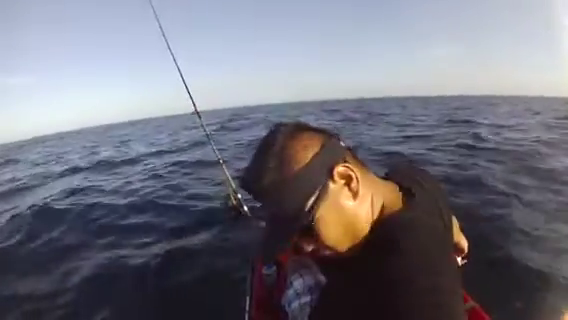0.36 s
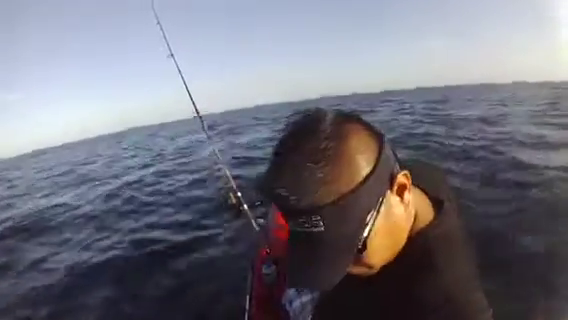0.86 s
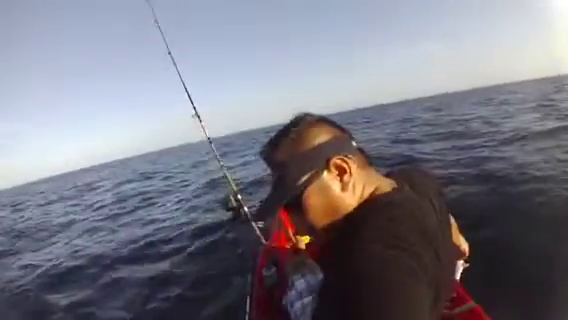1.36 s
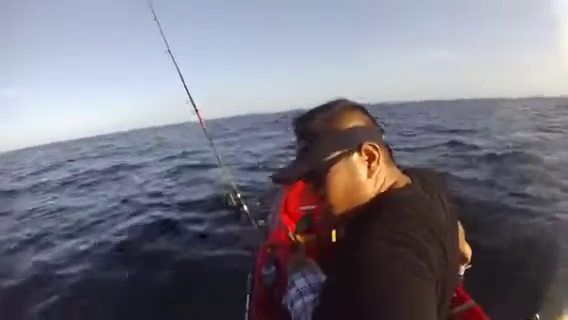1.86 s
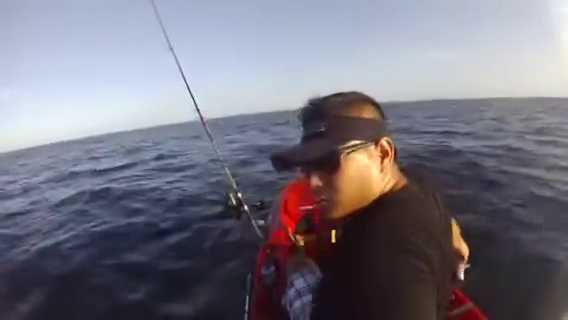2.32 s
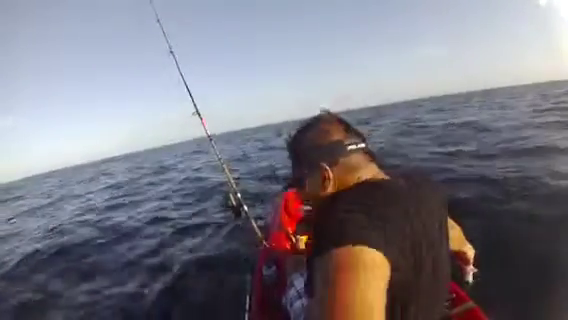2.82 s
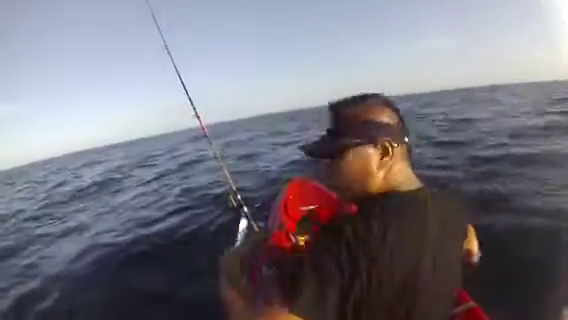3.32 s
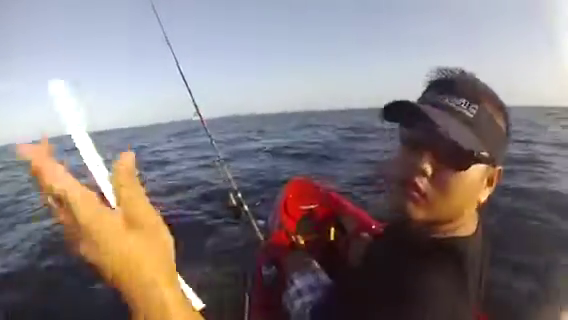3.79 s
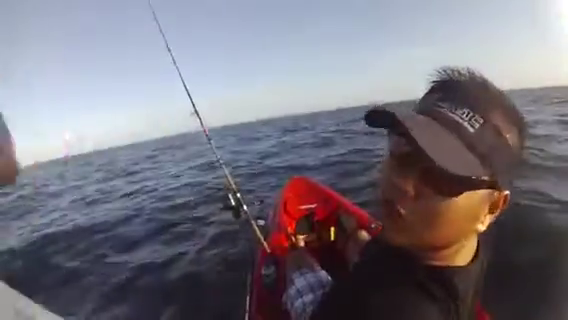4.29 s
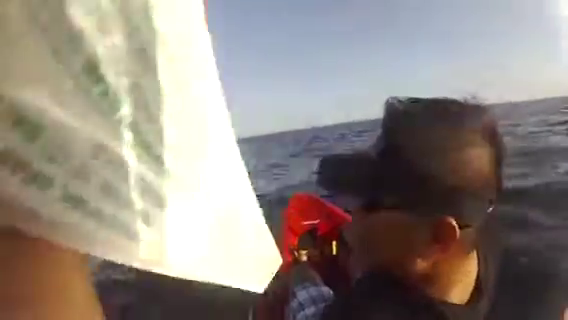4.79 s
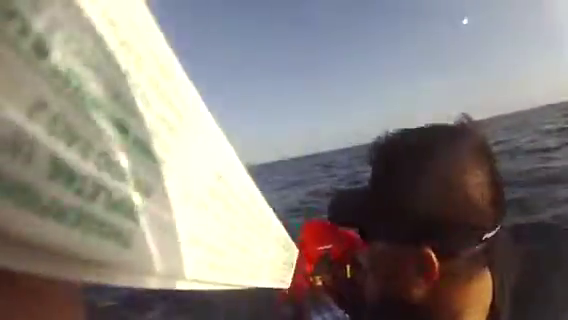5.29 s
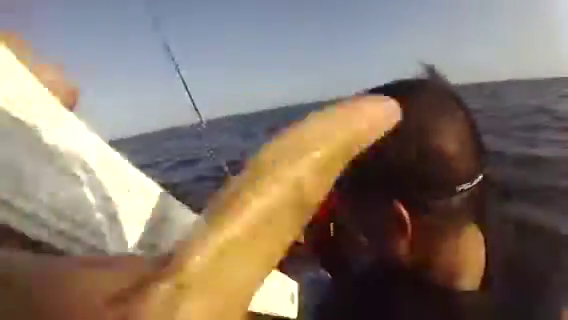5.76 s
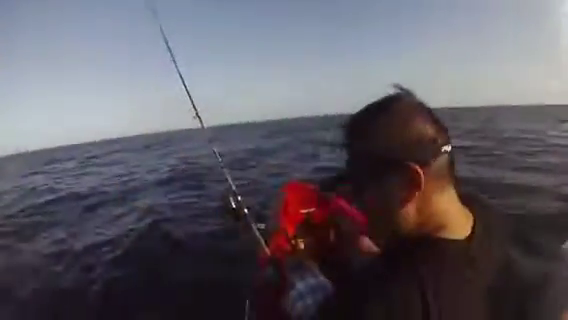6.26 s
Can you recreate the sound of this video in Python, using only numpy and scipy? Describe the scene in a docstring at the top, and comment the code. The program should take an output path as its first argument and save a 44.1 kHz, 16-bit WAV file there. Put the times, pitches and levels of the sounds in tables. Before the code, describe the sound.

Close, boxy sound from a cased microphone: soft hiss, a barely audible hum, irregular dull thumps and seat shuffles through a boat hull, busiest midway. Then a finger squeaks on plastic, paper scuffs the case and sharp clacks with heavy thuds strike it. A crackling, clipped jolt bursts out and the background drops to near-silence with tiny leftover knocks.

```python
"""Cased camera on a small boat

Over microphone hiss and a faint hum, shifting weight knocks and shuffles through the hull: clicks into ringing modes.
Then a hand wipes the camera's sealed plastic case: friction grains rub, clicks into case modes make hard taps,
and stick-slip grains with chirps squeak. A rattling jolt of alternating shoves overloads the microphone; the hiss
drops after the squeak and falls far lower during the jolt."""
import sys
import numpy as np
from scipy import signal
from scipy.fft import rfft, irfft, next_fast_len
from scipy.io import wavfile

SR = 44100
rng = np.random.default_rng(int(sys.argv[2]) if len(sys.argv) > 2 else 0)


def unload_audio(sound):
    """Save the sound as a 16-bit wav file, at the path given as the first command line argument."""
    columns = np.transpose(np.atleast_2d(sound))
    # keep every value between -1 and 1, then stretch to whole-number steps
    steps = np.round(np.clip(columns, -1, 1) * 32767)
    wavfile.write(sys.argv[1], SR, steps.astype(np.int16))


def level_to_linear(level):
    """Convert decibel levels to linear amplitude factors, elementwise."""
    exponent = np.asarray(level, float) / 20
    return 10 ** exponent


N = 281421   # length in samples
CUTOFF_HZ = 15500   # top of the hiss; the microphone's top cut lies just above


def rms_one(x):
    """Scale to rms 1."""
    return x / np.sqrt(np.mean(x ** 2) + 1e-20)


def in_time(rows):
    """Curve columns at every sample, silent outside the curve."""
    s, *columns = np.transpose(rows)
    t = np.arange(N) / SR
    return [np.interp(t, s, c, left=-200, right=-200) for c in columns]


def swells(rows, start_db, end_db):
    """Gain of each level column: a gesture sets in below its peak, rises, falls and lets go within 5 ms."""
    out = 0
    for s, rise, fall, *peak_db in rows:
        times = s + np.cumsum([-.005, .005, rise, fall, .005])
        levels = [-60, start_db, 0, end_db, end_db - 40]
        shape, = in_time(np.transpose([times, levels]))
        out = out + level_to_linear(shape + np.array(peak_db)[:, None])
    return out


def train(times, sizes):
    """Clicks of the given sizes at the given times."""
    out = np.full(N, 1e-18)
    np.add.at(out, np.minimum((np.asarray(times) * SR).astype(int), N - 1), sizes)
    return out


def grains(per_s, spread_db):
    """Random clicks of uneven size; rms 1."""
    sizes = level_to_linear(spread_db * np.minimum(rng.exponential(1, N), 4))
    sizes = sizes * rng.choice([-1, 1], N)
    return rms_one(sizes * (rng.random(N) < per_s / SR))


def ring(x, hz, t60):
    """Two-pole resonance: a unit click sets a sine of height 1 ringing, 60 dB down after t60 seconds."""
    r = level_to_linear(-60 / (t60 * SR))
    w = 2 * np.pi * hz / SR
    return signal.lfilter([0, np.sin(w)], [1, -2 * r * np.cos(w), r * r], x)


def peaks(x, table):
    """Parallel resonances, each with its gain on top, signs alternating."""
    out = 0
    for k, (hz, width, db) in enumerate(table):
        t60 = np.log(1000) / np.pi / width
        out = out + (-1) ** k * level_to_linear(db) * width / SR * np.pi * ring(x, hz, t60)
    return out


# colour of the hiss: f/Hz, relative density level/dB per Hz
HISS_COLOUR = [(30, -29), (60, -33.5), (108, -21), (172, -18.5), (233, -8), (698, -5.5), (862, -2.5),
               (15000, -21.5)]
# hiss rms, dropping after the squeak and far more during the jolt: t/s, level/dB
HISS_LEVEL = [(0, -48.5), (.5, -46.5), (4.39, -47), (4.42, -52), (5.42, -51.5), (5.435, -78.5),
              (6.39, -80.5)]


def hiss():
    """Microphone and far water: noise coloured in its spectrum, then ridden along a level curve."""
    hz, db = np.transpose(HISS_COLOUR)
    size = next_fast_len(N)
    f = np.arange(size // 2 + 1) * SR / size
    colour = level_to_linear(np.interp(np.log(f + 1), np.log(hz), db)) * (f < CUTOFF_HZ)
    noise = irfft(rfft(rng.standard_normal(size)) * colour, size)[:N]
    return level_to_linear(in_time(HISS_LEVEL)[0]) * rms_one(noise)


# resonances of the hull: f/Hz, relative level/dB, t60/s
HULL_MODES = [(145.2, -9, 0.12), (215, -7, 0.25), (241.3, -0.5, 0.1), (352, -4, 0.079), (560, -9, 0.14),
              (611, -0.5, .07), (683, -1, 0.048), (773, -7, 0.068), (830.3, -5.5, 0.083), (1128, -8, 0.045),
              (1564, -1.5, 0.015), (1914, -10.5, 0.018), (2970, -7, 0.0038)]
# where the modes divide into boom, body, ring and edge: f/Hz
HULL_SPLITS = [450, 725, 1000]
# knocks through the hull, before each mode's own level: t/s, boom, body, ring and edge level/dB
KNOCKS = [(0.384, -45, -43, -36, -55), (0.441, -11, -27.5, -23.5, -58), (0.468, -16.5, -43, -44, -29.5),
          (0.953, -38, -38, -54, -58), (1.082, -39, -31, -30, -43), (1.295, -24, -32, -34, -39.5),
          (1.775, -34, -25.5, -37, -34.5), (2.214, -21, -27.5, -22.5, -28.5), (2.536, -55, -40, -30.5, -39),
          (2.57, -22, -38.5, -30, -42), (2.651, -25, -29, -24, -32), (2.671, -16.5, -18.5, -21, -31),
          (2.788, -26.5, -40, -30.5, -50), (2.984, -29.5, -37.5, -27.5, -39.5),
          (3.936, -33.5, -28, -23, -47), (6.328, -56, -59, -58, -64), (6.365, -71, -57.5, -66, -62)]
# restless small movements on the seat: t/s, boom drive level/dB, ring drive level/dB
RESTLESS = [(0, -48, -53), (.08, -47.5, -39), (.35, -64, -75), (.65, -54.5, -57), (1.4, -50, -45),
            (2.0, -42.5, -44.5), (3.1, -58.5, -59), (3.9, -68, -61), (4.02, -46, -53), (4.3, -86, -70)]
# weight shifting on the seat: start t/s, rise t/s, fall t/s, peak boom drive level/dB, peak ring drive level/dB
SHIFTS = [(.385, 0.075, .11, -26, -25.5), (1.625, 0.024, 0.083, -43, -30.5), (1.72, 0.054, .02, -39, -23.5),
          (1.8, 0.07, 0.038, -50, -39), (2.535, 0.05, 0.1, -50, -31.5), (2.65, 0.037, 0.13, -38, -30.5)]


def hull():
    """A knock is a soft blow with a short rumble after it; shuffling is a dense stream of tiny contacts."""
    knocks = np.array(KNOCKS)
    moving = level_to_linear(np.array(in_time(RESTLESS))) + swells(SHIFTS, start_db=-9, end_db=-19)
    boom_db, ring_db = 20 * np.log10(moving)
    edge_db = -45.5 + 1.46 * (ring_db + 40.5)   # harder shuffling is brighter
    # one row each for boom, body, ring, edge; the body follows the ring
    drive = level_to_linear([boom_db, ring_db, ring_db, edge_db])
    # water keeps the ring modes murmuring
    drive[2] += level_to_linear(np.where(ring_db > -100, -52., ring_db))

    stream = grains(per_s=450, spread_db=4.5)
    rumble = grains(per_s=1300, spread_db=1.5)
    fade = np.exp(-1 / (0.0122 * SR))   # rumble decays with a 12.2 ms time constant
    out = 0
    for hz, level_db, t60 in HULL_MODES:
        part = np.searchsorted(HULL_SPLITS, hz)
        uneven_db = 2 * rng.standard_normal(len(knocks))
        late = 0.001462 * np.abs(rng.standard_normal(len(knocks)))   # seconds
        size = level_to_linear(knocks[:, 1 + part] + level_db + (3 if part else -5) + uneven_db)
        blows = train(knocks[:, 0] + late, size)
        blows += level_to_linear(-30.5) * rumble * signal.lfilter([1], [1, -fade], blows)
        shuffle = level_to_linear(level_db - 28) * drive[part] * stream
        swell = ring(blows + shuffle, hz, t60 / 10)   # the mode swells before it dies
        out = out + ring(swell, hz, t60) * 20 * np.log(1000) / (t60 * SR)
    return out


def hum():
    """Noise through a narrow resonance, twice: a faint hum that wavers until the hand reaches the case."""
    peak = [(864, 22, 0)]   # f/Hz, width/Hz, level/dB
    tone = rms_one(peaks(peaks(rng.standard_normal(N), peak), peak))
    return level_to_linear(-59.5) * tone * (np.arange(N) < 4.3 * SR)


# resonances of the camera case, shared by rubbing and taps: f/Hz, relative level/dB, t60/s
CASE_MODES = [(180.7, -13, 0.079), (300, -4, 0.033), (417, -2, 0.033), (563, 3.5, 0.022),
              (790, -10.5, 0.017), (1510, 4, 0.0065), (1990, 1, 0.0058), (2507, -1, 0.0034),
              (3300, -9, 0.0059)]
# scratch resonances of paper on the case: f/Hz, width/Hz, level/dB per pass
PAPER_PEAKS = [(1330, 270, 4.5), (2050, 1300, -2.5), (3400, 710, -5)]
# paper lying against the case: t/s, low level/dB, high level/dB
PAPER = [(4.29, -80, -88), (4.32, -38.5, -44), (4.44, -44, -42.5), (4.47, -55, -70), (4.65, -58.5, -77),
         (4.72, -45.5, -45), (5.03, -45, -61.5), (5.07, -48, -46.5), (5.39, -52.5, -55), (5.47, -44.5, -62),
         (5.53, -78, -80)]
# short scuffs of the paper: start t/s, rise t/s, fall t/s, peak low level/dB, peak high level/dB
SCUFFS = [(4.665, 0.026, 0.044, -34.5, -40), (4.798, 0.022, 0.031, -26.5, -28.5),
          (4.885, 0.015, 0.013, -30.5, -35.5), (5.4, 0.014, 0.0081, -45, -16), (5.6, .012, .045, -62, -68)]


def rubbing():
    """Friction grains: the low case modes rumble, the paper scratches above them."""
    gains = level_to_linear(np.array(in_time(PAPER))) + swells(SCUFFS, start_db=-14.5, end_db=-19.5)
    low_gain, high_gain = gains
    low = 0
    for hz, db, t60 in CASE_MODES[:5]:
        low = low + level_to_linear(db) / hz * ring(grains(per_s=540, spread_db=4.0), hz, t60)
    scratch = grains(per_s=5900, spread_db=-1.5)
    high = peaks(peaks(scratch, PAPER_PEAKS), PAPER_PEAKS)   # two passes sharpen the peaks
    return low_gain * rms_one(low) + high_gain * rms_one(high)


# taps on the case, before trims and modes: t/s, thud level/dB, tick level/dB, tilt of the thud in dB per octave
TAPS = [(4.304, -30, -25.5, -3), (4.658, -1, -21, 1.5), (4.82, 1, -21, 3.5), (4.834, -10.5, -23, -5.5),
        (4.899, -24, -35, 5), (4.956, 2.5, -12.5, 5.5), (4.963, -9.5, -24.5, -6.5),
        (4.971, -13.5, -26, -0.5), (5.039, -16, -62, -1.5), (5.222, -45, -31.5, -1),
        (5.439, -11.5, -22.5, 3.5), (5.4465, -18, -15, 0), (5.461, -38.5, -43.5, 1), (5.467, -28, -45, -2),
        (5.602, -38.5, -56.5, -5), (5.64, -48.5, -63, 0)]


def taps():
    """A ragged tick in the upper case modes, then the softer thud in the lower ones, tilted by where it lands."""
    s, thud_db, tick_db, tilt_db = np.transpose(TAPS)
    tick = train(s + .0015, level_to_linear(tick_db - 5.0))
    tail = signal.lfilter([1], [1, -.99], tick)
    tick += level_to_linear(-11.0) * grains(per_s=6500, spread_db=2.5) * tail

    # light taps are duller: blend a bright and a dull tick by strength
    hard = level_to_linear(np.minimum(np.interp(np.arange(N) / SR, s, tick_db) + 20.5, 0))
    bright = signal.lfilter([.5], [1, -.5], tick)
    dull = level_to_linear(5.0) * signal.lfilter([.04], [1, -1.6, .64], tick)
    tick = hard * bright + (1 - hard) * dull

    pivot_hz = CASE_MODES[2][0]
    out = 0
    for hz, db, t60 in CASE_MODES:
        blow = tick
        if hz < 1000:
            size = level_to_linear(thud_db - 9.0 + tilt_db * np.log2(hz / pivot_hz))
            blow = signal.lfilter([.15], [1, -.85], train(s + 0.00266, -size))
        out = out + level_to_linear(db) * ring(blow, hz, t60)
    return out


# high resonances of the case under the squeak: f/Hz, width/Hz, level/dB
SQUEAK_PEAKS = [(700, 130, -6), (1500, 340, -4), (1999, 600, -6.5), (3370, 300, -2), (3970, 250, -1),
                (4440, 300, -3), (6060, 700, -8), (7700, 1200, -17)]
# the squeak's grain: start t/s, rise t/s, fall t/s, peak level/dB
SQUEAK_GRAIN = [(4.361, .027, .03, -16)]
# chirps of a finger slipping on the case, the first (469 Hz) a small low thud instead: t/s, drive level/dB,
# f/Hz
CHIRPS = [(4.354, -28, 469), (4.362, -14, 2050), (4.363, -11.5, 4270), (4.374, -5, 3780),
          (4.383, -4.5, 3810), (4.389, -5, 3260), (4.393, 2.5, 1520), (4.394, -15, 5980),
          (4.405, -13.5, 1500), (4.408, -12.5, 4003)]


def squeak():
    """Stick and slip: dense grains in the case's high resonances, with chirps that swell for three milliseconds."""
    grain = peaks(grains(per_s=6000, spread_db=4.0), SQUEAK_PEAKS)
    soft = signal.lfilter([1], [1, -.3], grain)
    out = swells(SQUEAK_GRAIN, start_db=-14, end_db=-12.5)[0] * rms_one(soft)
    swell = np.hanning(150) / 75
    for s, db, hz in CHIRPS:
        drive = swell * np.cos(2 * np.pi * hz * np.arange(150) / SR)
        push = np.convolve(train([s], 2 * level_to_linear(db)), drive)[:N]
        out += ring(push, hz, 54 / hz)   # 54 cycles to fall 60 dB
    return out


# throws of the jolt, to one side and the other in turn: t/s, shove level/dB, crackle level/dB (before filtering)
JOLT = [(5.4102, 7, 0), (5.4116, 6, -8), (5.413, 9, -28), (5.4149, 6, -8.5), (5.4151, 9.5, -11.5),
        (5.4195, 4, -2), (5.4226, 4, -19), (5.4233, 2, -19.5), (5.4266, 3, -15), (5.4285, 3.5, -7.5),
        (5.432, -3, -13), (5.4338, 3, -9)]


def jolt():
    """Each throw shoves the microphone to the other side with a brief crackle; it leaks back to rest after each."""
    s, shove_db, crackle_db = np.transpose(JOLT)
    steps = train(s, -level_to_linear(shove_db) * (-1) ** np.arange(len(s)))
    edges = signal.lfilter([.2], [1, -.8], steps)
    leak = np.exp(-2 * np.pi * 270 / SR)   # 270 Hz corner
    shove = signal.lfilter([1], [1, -leak], edges)
    shove = signal.lfilter([1, -1], [1, -.99], shove)   # no steady offset remains

    burst = signal.lfilter([1], [1, -.97], train(s - .0005, level_to_linear(crackle_db)))
    crackle = burst * grains(per_s=7300, spread_db=4.0)
    return shove + signal.lfilter([.5], [1, -1.0, .25], crackle)


def scene():
    """Everything reaches the one microphone through the case; hull and case have no modes in the deep bass."""
    bodies = hull() + rubbing() + taps()
    bodies = signal.sosfilt(signal.butter(4, 120, "high", fs=SR, output="sos"), bodies)
    return (hiss() + bodies + hum() + squeak() + jolt())[None]


def top_cut(x):
    """Nothing passes above the cut-off."""
    return signal.sosfilt(signal.butter(12, 16420, fs=SR, output="sos"), x)


def record(dry):
    """Steep bass cut with a faint shelf below it, hard overload, top cut."""
    x = signal.sosfilt(signal.butter(3, 115, "high", fs=SR, output="sos"), dry)
    x = x + level_to_linear(-32) * dry   # the faint shelf
    x = np.clip(x, -1, 1)
    x = signal.sosfilt(signal.cheby2(12, 60, CUTOFF_HZ + 1200, fs=SR, output="sos"), x)
    return top_cut(x)


dry = scene()
out = record(dry)
unload_audio(out)
```